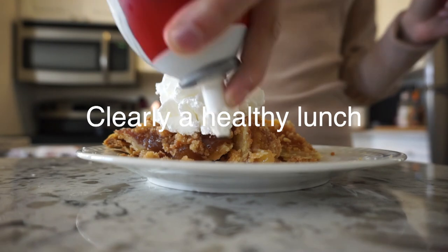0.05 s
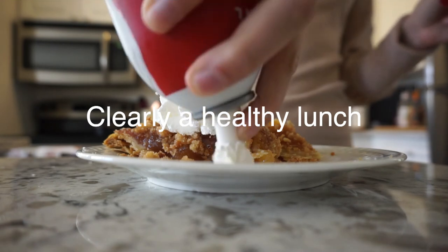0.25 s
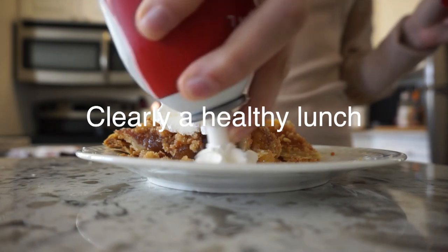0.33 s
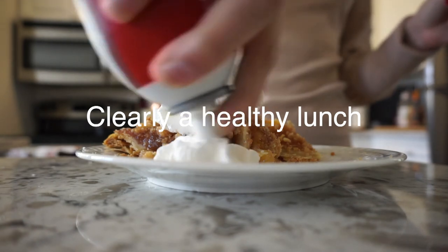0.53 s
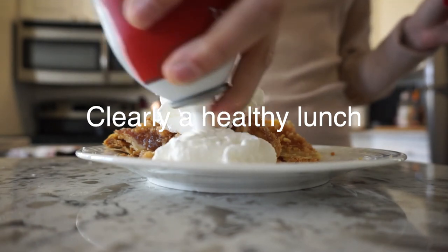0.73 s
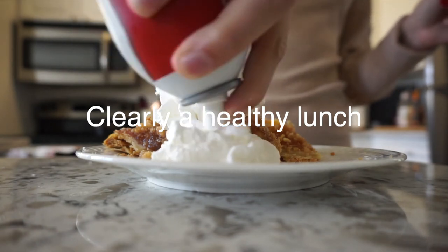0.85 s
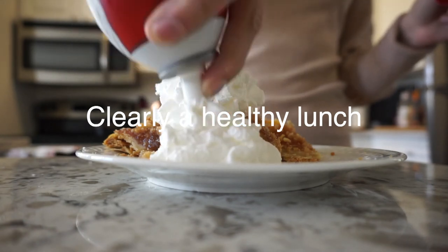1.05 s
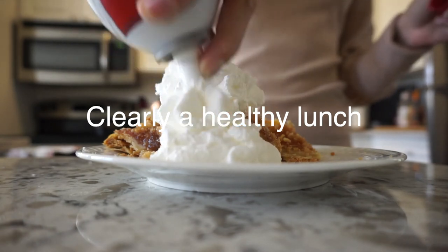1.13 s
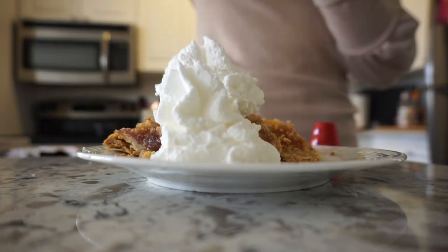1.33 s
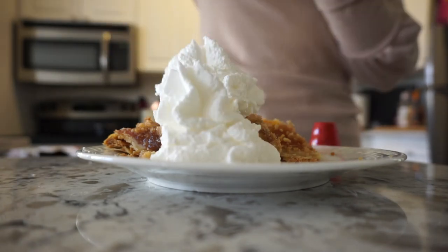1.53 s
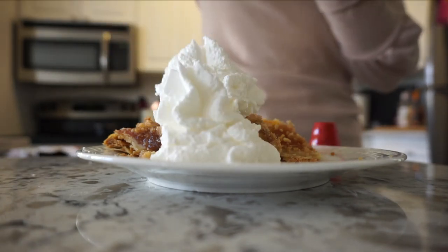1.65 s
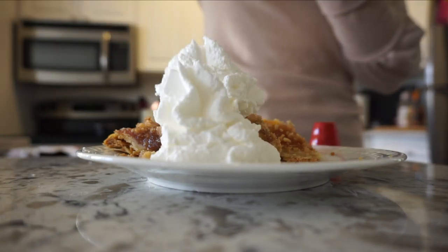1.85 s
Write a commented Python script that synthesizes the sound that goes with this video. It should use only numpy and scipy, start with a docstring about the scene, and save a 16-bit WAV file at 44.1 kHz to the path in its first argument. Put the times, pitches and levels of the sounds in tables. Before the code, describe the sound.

Close to the microphone, a spray can squirts whipped cream in one spluttering, gurgling hiss with little pops and spits. The spray cuts off, then a person moves with a quiet, crackly rustle in the kitchen.

```python
"""A faint valve tick, then single pops: a can sprays whipped cream onto a plate, close by in a small kitchen.
Gas pockets burst at the nozzle and ring a hollow in the cream, thickening into a wet splutter
over the hiss of escaping gas, with a few bright spits. The valve shuts and the room dies away;
then a soft crackling rustle grows as the cook turns aside. An appliance hums faintly throughout."""
import sys
import numpy as np
from scipy import signal
from scipy.fft import rfft, irfft
from scipy.io import wavfile

SR = 44100
rng = np.random.default_rng(int(sys.argv[2]) if len(sys.argv) > 2 else 0)


def dump_mix(stems):
    """Bounce the given channels to the path in sys.argv[1] as a 16-bit WAV at rate SR."""
    frames = np.atleast_2d(stems).T  # one column per channel
    limited = np.clip(frames, -1, 1)  # hard clip at full scale
    pcm = np.round(limited * 32767).astype(np.int16)
    wavfile.write(sys.argv[1], SR, pcm)


N = 83790
T = np.arange(N) / SR


def amp(db):
    """Decibels to gain."""
    return 10 ** (np.asarray(db) / 20)


def unit_rms(x):
    """Scales to an rms of one."""
    return x / np.sqrt(np.mean(x ** 2) + 1e-20)


def lookup(rows, hz, column=1):
    """Interpolates a table column over log frequency."""
    table = np.array(rows, float)
    return np.interp(np.log(hz + 1), np.log(table[:, 0] + 1), table[:, column])


def add(mix, start_s, sound):
    """Adds a sound to the mix in place."""
    part = mix[:, round(start_s * SR):][:, :sound.shape[1]]
    part += sound[:, :part.shape[1]]


def coloured(x, spectrum, size=4096):
    """Minimum-phase filter with the given spectrum."""
    log_gain = np.log(amp(lookup(spectrum, abs(np.fft.fftfreq(size, 1 / SR)))))
    response = np.exp(np.conj(signal.hilbert(log_gain)))
    taps = np.fft.ifft(response).real[:size // 2]
    return signal.fftconvolve(x, taps[None], axes=1)[:, :x.shape[1]]


def resonate(x, hz, width_hz):
    """Unity-gain resonance that follows the curve hz."""
    carrier = np.exp(2j * np.pi * np.cumsum(hz) / SR)
    pole = np.exp(-np.pi * width_hz / SR)
    return 2 * (carrier * signal.lfilter([1 - pole], [1, -pole], x / carrier)).real


def burst(spectrum, decay_s, fizz, size=4000):
    """A snap and a dying puff of noise; the common signal peaks at one."""
    x = fizz * rng.standard_normal((2, size)) * np.exp(-np.arange(size) / SR / decay_s)
    x[0, 0] += 1
    x = coloured(x, spectrum)
    return x / abs(x[0]).max()


def ports(x, table):
    """Spreads a common signal x[0] and an unshared x[1] over two microphone ports."""
    hz = np.fft.rfftfreq(N, 1 / SR)
    common, unshared = rfft(x)
    coherence = np.clip(lookup(table, hz), 0, 1)
    mid = common * np.sqrt((1 + coherence) / 2)
    side = unshared * np.sqrt((1 - coherence) / 2)
    pan = amp(lookup(table, hz, column=3) / 2) * np.exp(.5j * lookup(table, hz, column=2))
    return irfft(np.array([(mid + side) * pan, (mid - side) / pan]), N)


def diffuse_noise(coherence):
    """White noise reaching the ports from all sides."""
    return ports(rng.standard_normal((2, N)), np.pad(coherence, ((0, 0), (0, 2))))


# Room noise. Each row: frequency in Hz, relative level in dB.
AIR_SPECTRUM = [(25, -14), (130, -6), (240, 2.5), (400, -14), (2500, -17), (8000, -25), (16000, -22)]
# Room noise between the ports. Each row: frequency in Hz, coherence 0-1.
AIR_COHERENCE = [(200, 0.9), (500, .3), (3000, 0.17)]


def background(air_db=-63.5, hum_hz=60, hum_db=-67.5):
    """Quiet room noise and the hum of an appliance."""
    air = unit_rms(coloured(diffuse_noise(AIR_COHERENCE), AIR_SPECTRUM))
    hum = np.sqrt(2) * np.sin(2 * np.pi * hum_hz * T)
    return amp(air_db) * air + amp(hum_db) * hum


# Room decay. Each row: frequency in Hz, seconds to fall 60 dB.
KITCHEN_RT60 = [(700, 0.31), (1800, 0.28), (4600, 0.34), (12000, 0.23)]
# Room tail between the ports. Each row: frequency in Hz, coherence 0-1.
TAIL_COHERENCE = [(500, 1), (1000, 0.8), (2400, 0.8), (3600, .05)]


def kitchen(x, gap_s=0.0056):
    """A short diffuse tail, each band dying at its own rate."""
    hz, t, bands = signal.stft(diffuse_noise(TAIL_COHERENCE)[:, :SR // 2], SR, nperseg=256)
    decay = amp(-60 * t / lookup(KITCHEN_RT60, hz)[:, None])
    _, tail = signal.istft(bands * decay, SR, nperseg=256)
    tail *= np.arange(tail.shape[1]) > gap_s * SR
    return signal.fftconvolve(x[None], tail / np.linalg.norm(tail[0]), axes=1)[:, :N]


# Rustle swell. Each row: time in seconds, body level in dB, top level in dB.
RUSTLE_LEVELS = [(1.396, -93, -69), (1.425, -58.5, -53), (1.48, -54, -45.5), (1.535, -44.5, -42),
                 (1.7, -42, -40.5), (1.8, -39, -39.5), (1.9, -38.5, -38.5)]
# Crackles. Each row: start in seconds, level in dB, relative treble in dB.
CRACKLE_EVENTS = [(1.419, -26.5, -8), (1.435, -32.5, -3), (1.4845, -35.5, 3), (1.5134, -31.5, -12),
                  (1.5365, -29, -23), (1.5614, -20, -24), (1.5825, -27.5, -3), (1.619, -29.5, 3.5),
                  (1.663, -25, -1), (1.669, -23, -16), (1.687, -22, -11), (1.6964, -30, 5),
                  (1.7044, -21, -19), (1.711, -24.5, -11), (1.738, -24, -10), (1.769, -23.5, 1),
                  (1.7965, -21, -10), (1.8462, -17, 2), (1.866, -22, -4), (1.887, -23, -6)]
# Rubbing and crackle spectra. Each row: frequency in Hz, relative level in dB.
RUB_BODY_SPECTRUM = [(40, -36), (150, -13), (300, 1.5), (650, 3), (950, 2), (1400, -2), (2500, -11),
                     (8000, -74)]
RUB_TOP_SPECTRUM = [(700, -28), (1600, -21.5), (2150, 1.5), (2700, -16), (3600, -2.5), (4500, -6),
                    (5300, 2.5), (6400, -6.5), (7700, -13.5), (9500, -12), (11800, -8), (16000, -11.5)]
CRACKLE_SPECTRUM = [(100, -18.5), (500, -14), (1300, -8), (2200, 0.5), (3400, 0), (4600, -10), (5600, -12),
                    (7500, -23), (16000, -32)]
CRACKLE_TOP_SPECTRUM = [(1000, -39.5), (7500, -9), (9000, 2), (12000, 13), (16000, -2)]


def rustle(grains_per_s=640, grain_spread_db=3.6, tick_db=-5.5):
    """The cook turns: soft rubbing full of ticking grains, with sharper crackles on top."""
    times_s, *levels_db = np.transpose(RUSTLE_LEVELS)
    body, top = (amp(np.interp(T, times_s, db, left=-np.inf)) for db in levels_db)
    sizes = amp(grain_spread_db * np.minimum(rng.exponential(1, N), 3.5))
    hits = rng.random(N) < grains_per_s / SR
    grains = np.outer([1, 0], unit_rms(sizes * hits * rng.choice([-1, 1], N)))
    rubbing = rng.standard_normal((2, N))
    out = body * unit_rms(coloured(rubbing + 0.94 * grains, RUB_BODY_SPECTRUM))
    out += top * unit_rms(coloured(rubbing + 0.3 * grains, RUB_TOP_SPECTRUM))
    out += top * amp(tick_db) * unit_rms(coloured(grains, CRACKLE_SPECTRUM))
    for start_s, db, treble_db in CRACKLE_EVENTS:
        mids = burst(CRACKLE_SPECTRUM, decay_s=0.00049, fizz=0.21)
        treble = burst(CRACKLE_TOP_SPECTRUM, decay_s=0.00066, fizz=0.23)
        add(out, start_s, amp(db) * (mids + amp(treble_db) * treble))
    return out


# Large gas pockets. Each row: start in seconds, level in dB.
POP_EVENTS = [(.1675, -24), (.185, -20), (.198, -23), (.212, -14), (.2235, -19), (.2445, -15),
              (.2605, -7.5), (.2685, -10), (.460, -6), (.528, -9), (.550, -9), (.641, -11), (.707, -10),
              (1.138, -8)]
# Spits of gas. Each row: start in seconds, level in dB, decay in seconds.
SPIT_EVENTS = [(0.1672, -32.5, 0.0015), (0.462, -16.5, 0.0018), (0.471, -19, 0.0033), (0.5853, -11, 0.0029),
               (0.59, -13.5, 0.0021), (0.599, -19.5, 0.03), (.633, -16.5, .001), (.872, -23.5, .015),
               (.905, -15.5, 0.009), (1.023, -10.5, 0.0032)]
# Tick, pop and spit spectra. Each row: frequency in Hz, relative level in dB.
VALVE_SPECTRUM = [(50, -11), (240, 4), (620, 6), (1200, -13), (3300, -7), (5000, -24), (15000, -23.5)]
POP_SPECTRUM = [(60, -50), (200, -10), (450, -4), (900, 4.5), (1400, 6.5), (2200, -12.5), (4800, -15),
                (15000, -42)]
SPIT_SPECTRUM = [(500, -43), (3000, 3.5), (8300, -11), (9700, 4.5), (12800, 0), (16000, -18)]


def nozzle_bursts(valve_s=.1135, valve_db=-33.5):
    """The valve ticks as the nozzle tips over; large pockets pop and gas spits."""
    out = np.zeros((2, N))
    add(out, valve_s, amp(valve_db) * burst(VALVE_SPECTRUM, decay_s=0.0023, fizz=0.095))
    for start_s, db in POP_EVENTS:
        add(out, start_s, amp(db) * burst(POP_SPECTRUM, decay_s=.0015, fizz=0.075))
    for start_s, db, decay_s in SPIT_EVENTS:
        add(out, start_s, amp(db) * burst(SPIT_SPECTRUM, decay_s, fizz=1.0))
    return out


BUBBLE_LOW_HZ, BUBBLE_HIGH_HZ, BUBBLE_DECAY_CYCLES = 330.3, 3560, 1.06


def gas_pockets(count=450, per_s=210, bubbles_each=7, spread_db=1.1, puff_decay_s=0.0043):
    """An uneven train of pockets: the rings of their bursting bubbles and the envelope of their puffs."""
    jitter, strength = np.clip(rng.standard_normal((count, 2)), -2, 2).T
    starts_s = abs(np.arange(count) + .3 * jitter) / per_s
    pitches_hz = BUBBLE_LOW_HZ * (BUBBLE_HIGH_HZ / BUBBLE_LOW_HZ) ** rng.random((count, bubbles_each, 1))
    t, out = T[:SR // 50], np.zeros((2, N))
    for start_s, gain, hz in zip(starts_s, amp(spread_db * strength), pitches_hz):
        age = t * hz / BUBBLE_DECAY_CYCLES
        phase = 2 * np.pi * (hz * t + rng.random((bubbles_each, 1)))
        rings = hz * age * np.exp(-age) * np.sin(phase)
        puff = np.exp(-t / puff_decay_s)
        add(out, start_s, gain * np.array([rings.sum(0), puff]))
    return unit_rms(out[0]), unit_rms(out[1])


# Hollow between nozzle and cream. Each row: time in seconds, resonance in Hz, relative level in dB.
HOLLOW_TRACK = [(.2, 1130, -3), (.3, 1310, -8), (.38, 1420, 2), (.5, 1018, -12), (.66, 1440, -14),
                (.85, 1350, 1.5), (0.969, 1434, 7.5), (1.15, 1243, -4)]
# Wet splutter. Each row: frequency in Hz, relative level in dB.
SPLUTTER_SPECTRUM = [(100, -81.5), (450, -27.5), (850, 2.5), (1250, -0.5), (1750, -1.5), (2400, -13.5),
                     (6000, -56.5)]


def splutter(drive, width_hz=510):
    """Gas and bubbles splutter and ring the shifting hollow in the cream."""
    times_s, *columns = np.transpose(HOLLOW_TRACK)
    hz, db = (np.interp(T, times_s, column) for column in columns)
    hollow = unit_rms(resonate(resonate(drive, hz, width_hz), hz, width_hz))
    broad = unit_rms(coloured(drive, SPLUTTER_SPECTRUM))
    return unit_rms((broad + amp(db) * hollow) / np.hypot(1, amp(db)))


# Jet flow. Each row: time in seconds, then splutter, gurgle, rasp and hiss levels in dB.
JET_LEVELS = [(.14, -58.5, -70, -66, -55.5), (.178, -45, -46, -54, -46), (.257, -28, -34, -38, -38),
              (0.269, -20, -33, -31.5, -32), (.35, -19, -30, -30, -33.5), (.46, -22, -30, -29, -31),
              (.58, -21, -26, -26.5, -30), (.68, -18.5, -25, -27.5, -31), (.83, -21.5, -24, -30, -28.5),
              (0.919, -19, -22, -27, -27), (1.008, -19, -21.5, -31.5, -28), (1.06, -23, -25.5, -31, -26),
              (1.145, -23, -30, -31.5, -29), (1.176, -28.5, -29.5, -38, -37.5)]
# Low gurgle, nozzle rasp and gas hiss. Each row: frequency in Hz, relative level in dB.
GURGLE_SPECTRUM = [(30, -50.5), (110, -31), (190, -18), (290, -4.5), (410, 0), (640, 3.5), (850, -12),
                   (1300, -18), (4000, -44)]
RASP_SPECTRUM = [(400, -47.5), (2100, 2), (3050, 1), (3800, -12), (6000, -43.5)]
HISS_SPECTRUM = [(1000, -23), (3500, 3), (5200, 0.5), (6000, 4), (6600, -0.5), (7700, -2.5), (9100, -8),
                 (12200, -2), (14300, -8.5), (16000, -19)]


def jet(open_s=0.14, shut_s=0.011, off_db=-53, bubbling=.68, steady_gas=0.93, steady_hiss=0.55):
    """Gas pockets splutter, gurgle and rasp at the nozzle; escaping gas hisses in step with them."""
    times_s, *levels_db = np.transpose(JET_LEVELS)
    corners_s = [times_s[0] - open_s, times_s[0], times_s[-1], times_s[-1] + shut_s]
    valve = amp(np.interp(T, corners_s, [off_db, 0, 0, off_db])) - amp(off_db)
    mid, low, upper, high = (valve * amp(np.interp(T, times_s, db)) for db in levels_db)
    bubbles, puffs = gas_pockets()
    gas_noise, rasp_noise, hiss_noise = rng.standard_normal((3, 2, N))
    bursting = np.outer([1, 0], bubbling * np.sqrt(BUBBLE_HIGH_HZ / (SR / 2)) * bubbles)
    flow = steady_gas + puffs
    drive = unit_rms(gas_noise * flow) + bursting
    gurgle = unit_rms(coloured(drive, GURGLE_SPECTRUM))
    rasp = unit_rms(coloured(unit_rms(rasp_noise * flow) + bursting, RASP_SPECTRUM))
    hiss = unit_rms(coloured(hiss_noise * (steady_hiss + (1 - steady_hiss) * puffs), HISS_SPECTRUM))
    return mid * splutter(drive) + low * gurgle + upper * rasp + high * hiss


# Stereo images. Each row: frequency in Hz, coherence 0-1, left lead in radians, left minus right in dB.
CAN_IMAGE = [(450, 1, 0, 0), (800, 1, 0, -2), (1660, 1, 0, 0.3), (2800, 1, 0.5, -2.5),
             (3500, 0.6, -0.5, -1.5), (4540, .65, 2, -0.5), (5260, 0.5, 1.5, 2.5), (6670, 0.2, 2.5, -1.5),
             (7100, 0.93, 1.5, -1.5), (8750, 1, 0.32, 0), (10670, 0.7, 0.53, 0.5), (14000, .6, .5, 2.5)]
COOK_IMAGE = [(300, 1, 0, 1), (1100, 0.85, 0.43, -3.5), (2500, 0.93, 0.32, -1), (4610, .75, 0.55, -0.5),
              (6400, 0.31, 1.44, 4.5), (8800, 1, 0.03, -0.5)]


def scene(can_send_db=-11, cook_send_db=-20):
    """The can and the closer, drier rustle in the kitchen."""
    can = jet() + nozzle_bursts()
    cook = rustle()
    room = kitchen(amp(can_send_db) * can[0] + amp(cook_send_db) * cook[0])
    return ports(can, CAN_IMAGE) + ports(cook, COOK_IMAGE) + room + background()


def record(dry, cutoff_hz=15900):
    """Steep linear-phase low-pass."""
    taps = signal.firwin(511, cutoff_hz, window=("kaiser", 9), fs=SR)
    return signal.oaconvolve(dry, taps[None], "same", axes=1)


dry = scene()
out = record(dry)
dump_mix(out)
```